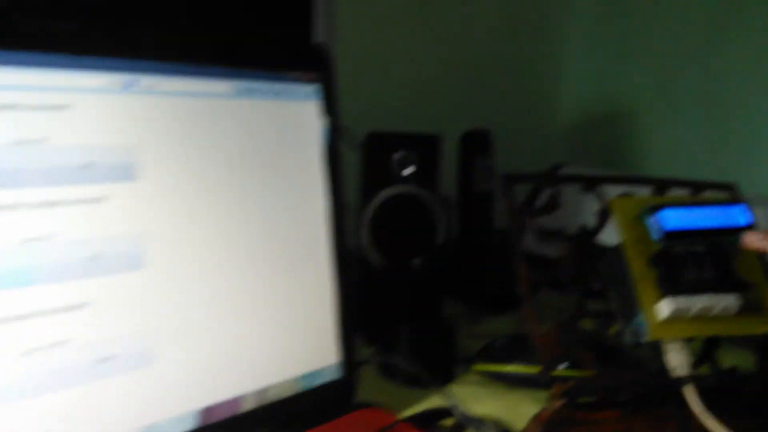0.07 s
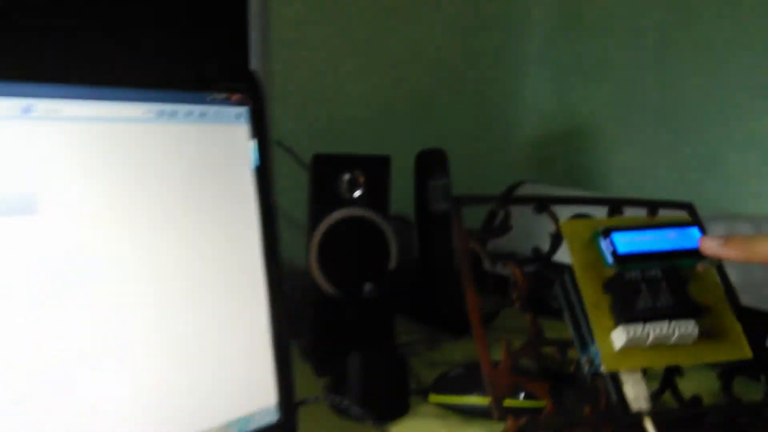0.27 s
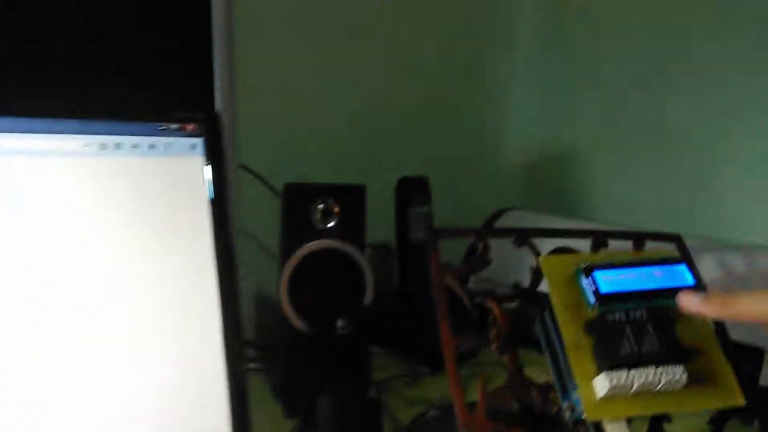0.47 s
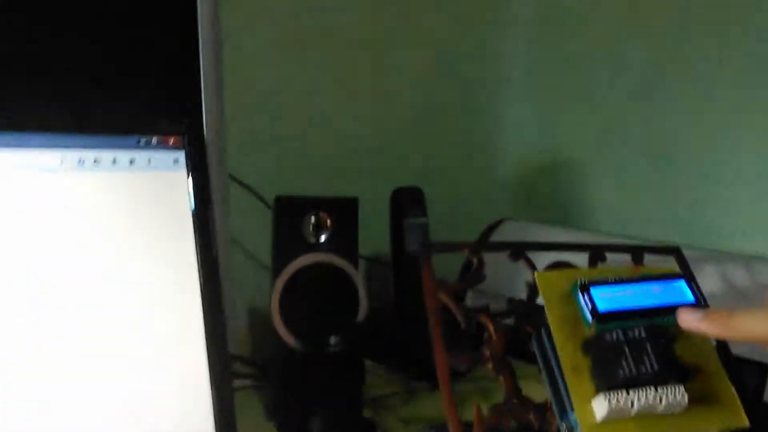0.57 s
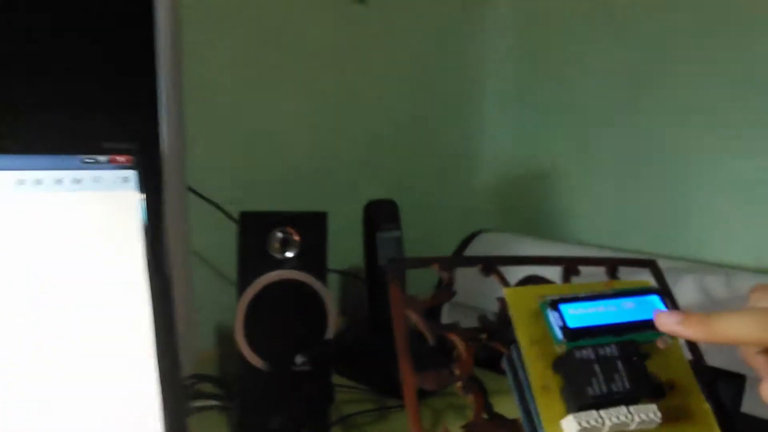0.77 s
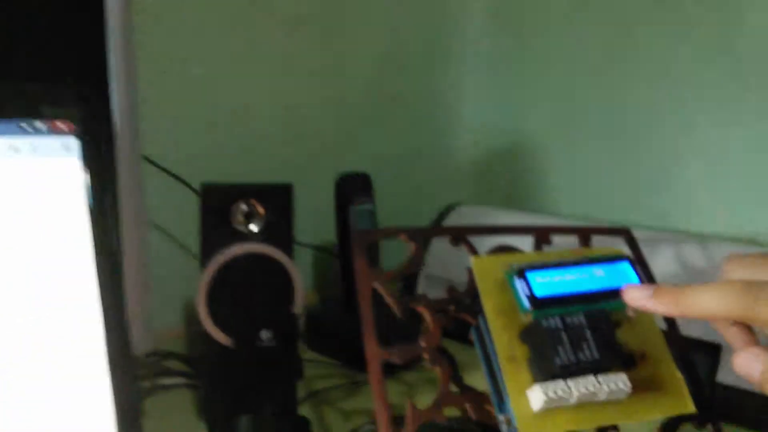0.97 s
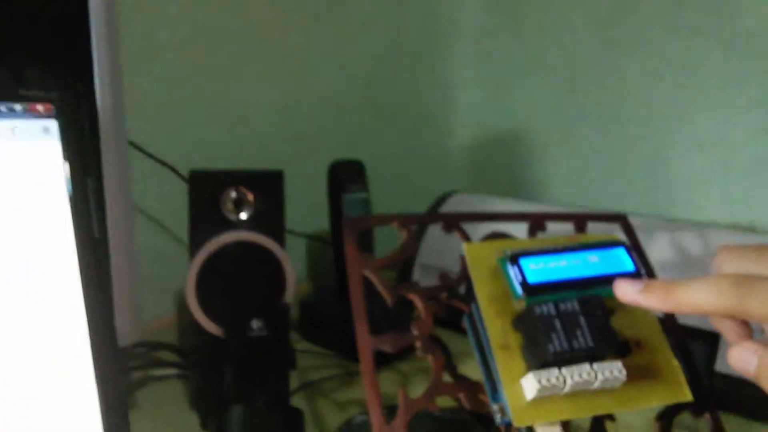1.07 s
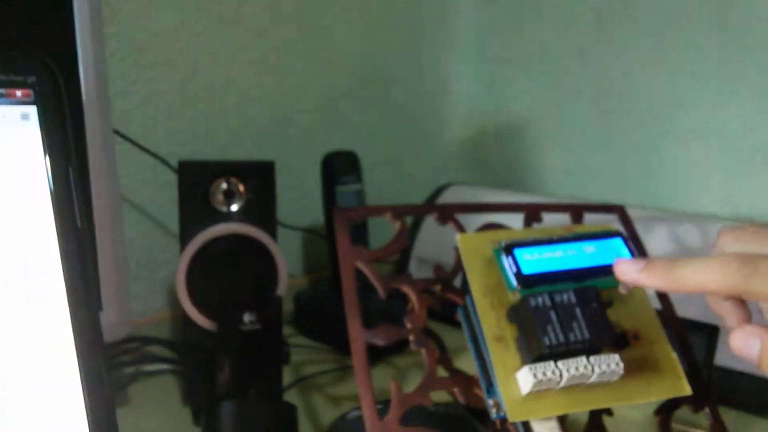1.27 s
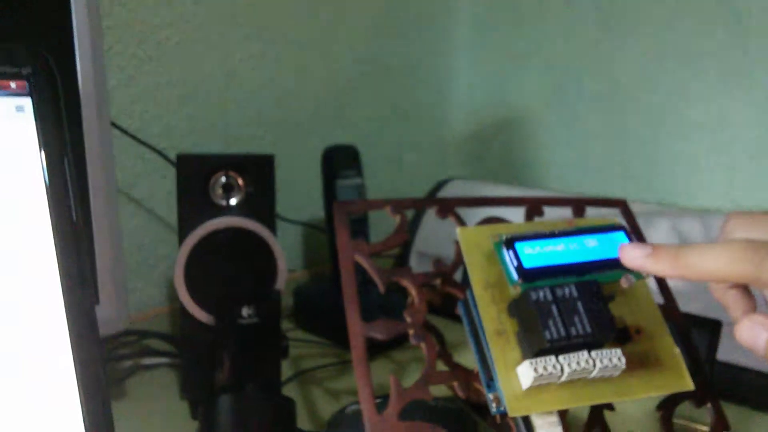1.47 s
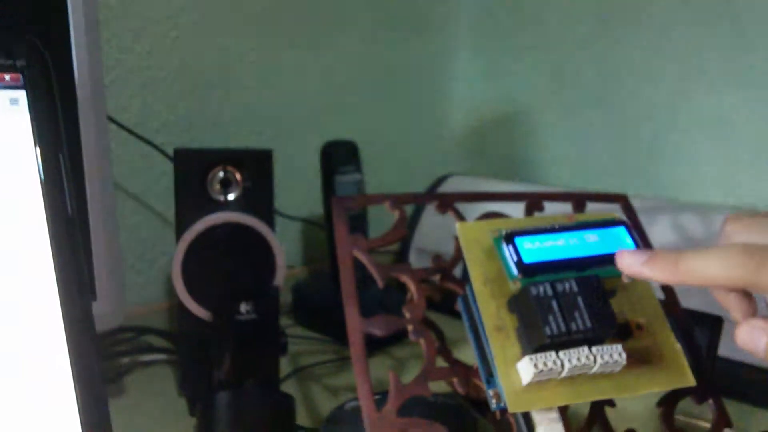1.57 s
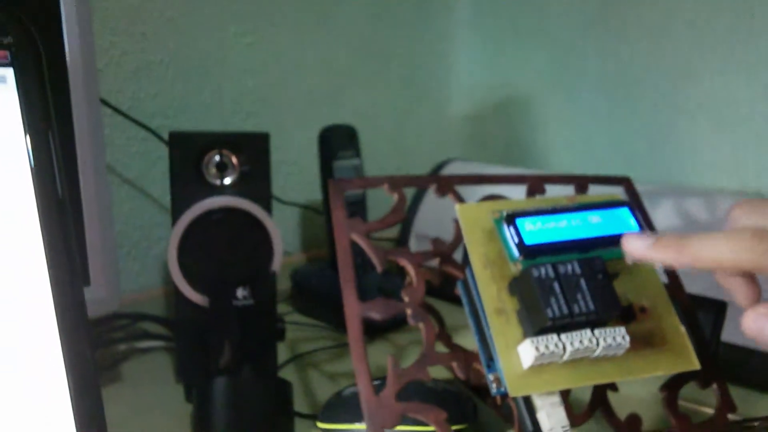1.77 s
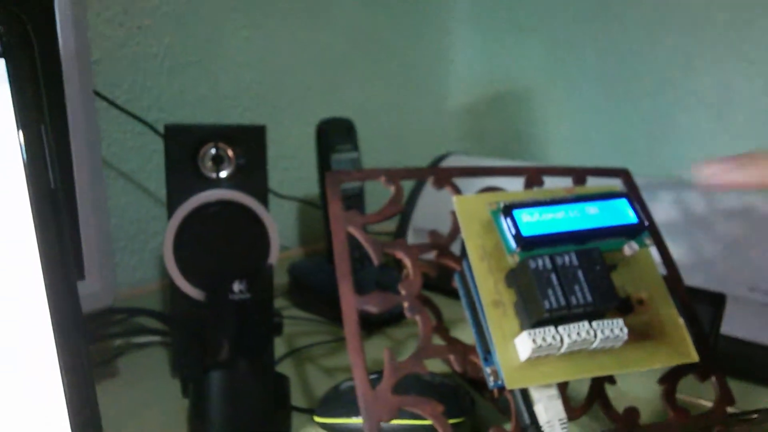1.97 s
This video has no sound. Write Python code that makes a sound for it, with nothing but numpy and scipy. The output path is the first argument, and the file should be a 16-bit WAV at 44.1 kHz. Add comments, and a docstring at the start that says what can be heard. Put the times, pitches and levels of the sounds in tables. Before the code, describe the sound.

Crisp relay clicks, seven in steady alternation, snap from a circuit board in a small room

```python
"""In a quiet room, small relays on a circuit board pull in and drop out in turn. Each armature strikes and
rebounds within a few milliseconds: noise bursts shaped like the plastic case. Every stroke also makes a bright
tick and rings the frame and springs, built from fading sine waves. The desk and room answer with echoes and
fading noise. Beneath lie a faint filtered-noise hiss, a thin wavering sine whine and soft low handling bumps."""
import sys
import numpy as np
from scipy import signal
from scipy.io import wavfile
from scipy.ndimage import uniform_filter1d

SR = 44100
rng = np.random.default_rng(int(sys.argv[2]) if len(sys.argv) > 2 else 0)


def master_out(mix):
    """Clip the mix to full scale and print it as 16-bit PCM to the path in sys.argv[1]."""
    frames = np.transpose(np.atleast_2d(mix))
    ceiling = np.clip(frames, -1, 1)
    pcm = np.round(ceiling * 32767).astype(np.int16)
    wavfile.write(sys.argv[1], SR, pcm)


N = 89567  # length of the scene in samples

# Names ending in T60 or t60_s give the seconds a sound takes to fade by 60 dB.
# Armatures pulling in: start_s, level_db (added to all parts), rebound_delay_s, rebound_db (against the strike),
# frame_db (added to frame modes), tilt_db (treble tilt, per octave high up), ping_hz, ping_db, tick_db
PULL_INS = [(.0411, -0.68, 0.0029, -27, -1, -2, 3150, -10, -5),
            (.6505, 0, .0026, 3.5, 2, -0.3, 1195, -23.5, -3.5),
            (1.2486, -0.07, .0017, -11, 3.5, 0.5, 4310, -28, -5.5),
            (1.7689, 0.2, .0010, -2.5, 1, -0.5, 7400, -17.5, -3)]
# Armatures dropping out: start_s, level_db, rebound_delay_s, rebound_db, frame_db, tilt_db,
# ping_hz, ping_db, tick_db
DROP_OUTS = [(.4102, -3.5, 0.0021, 5.5, -19, 0.013, 2926, -7.5, -2),
             (1.0011, -2.1, .0024, 13, 2, 0, 5020, -9, -2),
             (1.5590, -4.5, .0022, 4.5, 6, 0.034, 3110, -8.5, 0)]
# Ringing modes of board, frame and springs: pitch_hz, t60_s, pull_in_db, drop_out_db
RING_MODES = [(579.6, 0.43, -42.5, -38.5), (856.5, 0.086, -31.5, -51), (1185, 0.03, -28.5, -37.5),
              (1664, .045, -23.5, -19), (1894.3, 0.035, -15.5, -15), (2075, 0.015, -.5, -18),
              (2177, 0.03, -8.5, -17), (2377, 0.064, -17.5, -11), (2470, 0.025, -23.5, -18),
              (2938, 0.038, -20.5, -6), (3150, 0.029, -16.5, -27), (4295, 0.0072, -17, -22),
              (5076, 0.022, -17.5, -14.5), (8320, 0.016, -4, -14.5), (8565, 0.011, -11.5, -15)]
# Relative response of the plastic case: pitch_hz, pull_in_db, drop_out_db
CASE_RESPONSE = [(100, -42, -51), (486, -30.5, -29.5), (833.3, -34.5, -34), (1460, -14, -12),
                 (1750, -6, 0.5), (2600, -1, 1), (3420, -3.5, -4), (4500, -4.5, 1.5), (6070, 0, -1),
                 (6920, 8.5, 9.5), (8030, 6, -4), (8900, 8, 3), (9700, 2, 4), (11600, 2.5, 1),
                 (13500, 7, 6), (13600, -8.5, .5), (15250, 7, -2.5), (16200, -16.5, -6)]
# Desk echoes of the strike: delay_s, level_db
DESK_ECHOES = [(.0051, -11), (0.0086, -9)]
# Room response at each pitch: pitch_hz, t60_s, level_db
ROOM_RESPONSE = [(206, 0.79, 7), (520, 0.2, 4.5), (1106, 0.44, 2.5), (2020, 0.24, -7), (3020, .19, -5),
                 (4940, 0.19, 0), (8600, .18, -7.5), (12600, 0.21, -6), (16000, 0.12, -6.5)]
# Relative spectrum of the hiss: pitch_hz, level_db (per Hz)
HISS_SPECTRUM = [(20, -31), (50, -18), (95, -17.5), (170, -31), (270, -25), (420, -23.5), (620, -23),
                 (720, -21.5), (1010, -13), (1350, -11.5), (1550, -16.5), (1720, -14), (2100, -17.5),
                 (3050, -18.5), (3700, -22.5), (8000, -27.5), (15500, -21.5), (16200, -34)]
# Level of the whine over time: time_s, level_db
WHINE_LEVEL = [(0, -77), (0.698, -79), (1.0, -74), (1.502, -71.5), (2.001, -71)]
# Handling bumps: start_s, level_db (before rise and fade), pitch_hz
BUMPS = [(0.053, -54, 93.4), (0.104, -58.5, 96), (.271, -56, 89), (.293, -55.5, 96), (.321, -53, 96.5),
         (.599, -58, 89.3), (1.418, -67.5, 89)]

# Plastic case: RIPPLE_DB is the spread of its random unevenness, new for every stroke
CASE_DB, CASE_T60, CASE_RISE_S = 1.5, 0.034, 0.00005
RIPPLE_DB, TILT_FROM_HZ = 2.5, 3100
# Frame: it swells, and rings on while the armature settles; the held part fades at its own rate
FRAME_FROM_HZ, FRAME_BELOW_HZ = 1900, 2300
FRAME_SWELL_S, FRAME_HOLD_S, HELD_T60 = 0.0026, 0.0083, 0.35
# Springs and all other modes, and the stroke's own ping
SPRING_SWELL_S, SPRING_HOLD_S, PING_T60 = 0.00056, 0.0025, 0.03
# How much of each ring comes back from the room, and the extra fade of that tail
FRAME_WET_DB, SPRING_WET_DB, RING_ROOM_T60 = 1, 4.5, 1
# Bright tick of first contact
TICK_T60, TICK_LOW_HZ, TICK_HIGH_HZ = 0.011, 12000, 13000
# Room: scattered early echoes, a long late tail, and the rise of both
SCATTER_DB, SCATTER_T60, ROOM_RISE_S = -17.5, 0.063, 0.0015
LATE_DB, LATE_T60 = -18, 0.55
BUMP_RISE_S, BUMP_T60 = 0.0016, 0.091
# Hiss level, and the spread of its drifting patches
HISS_DB, PATCHY_DB = -66.5, 2.6
# Middle pitch of the whine, and the spread of its random waver
WHINE_HZ, WHINE_WAVER_HZ = 1020, 6.25
EDGE_HZ = 15950  # upper edge of the whole sound


def relay(strokes, column):
    """Each stroke ticks, cracks the case and rings frame and springs; column 1 is pull-in, 2 is drop-out."""
    out = np.zeros(N)
    for s, db, rebound_s, rebound_db, frame_db, tilt_db, ping_hz, ping_db, tick_db in strokes:
        add(out, s, amp(db + tick_db) * tick())
        add(out, s, amp(db + CASE_DB) * crack(rebound_s, rebound_db, tilt_db, column))
        ping = ring(ping_hz, PING_T60, SPRING_SWELL_S, SPRING_HOLD_S, SPRING_WET_DB)
        add(out, s, amp(db + ping_db) * ping)
        for hz, t60, *mode_db in RING_MODES:
            if FRAME_FROM_HZ < hz < FRAME_BELOW_HZ:
                frame = ring(hz, t60, FRAME_SWELL_S, FRAME_HOLD_S, FRAME_WET_DB)
                sound = amp(frame_db) * frame
            else:
                sound = ring(hz, t60, SPRING_SWELL_S, SPRING_HOLD_S, SPRING_WET_DB)
            add(out, s, amp(db + mode_db[column - 1]) * sound)
    return out


def crack(rebound_s, rebound_db, tilt_db, column):
    """Strike and rebound shake the case's many close modes; the desk echoes and the room answers."""
    t = np.arange(SR // 10) / SR
    # the room answers the combined energy of strike and rebound
    out = room(LATE_DB) * np.hypot(1, amp(rebound_db))
    knocks = [(0, 0), (rebound_s, rebound_db)] + list(DESK_ECHOES)
    for delay_s, db in knocks:
        rise = 1 - np.exp(-t / CASE_RISE_S)
        add(out, delay_s, amp(db) * dying_noise(t, CASE_T60) * rise)
    ripple_db = RIPPLE_DB * rng.standard_normal(size=100)
    ripple_hz = np.linspace(0, SR / 2, len(ripple_db))

    def case_db(hz):
        """Loudness the case gives each pitch, with its ripple and treble tilt."""
        tilt = tilt_db * np.log2(1 + hz / TILT_FROM_HZ)
        return read(CASE_RESPONSE, hz, column) + np.interp(hz, ripple_hz, ripple_db) + tilt

    return unit(colour(out, case_db))


def ring(hz, t60, swell_s, hold_s, wet_db):
    """One mode, a sine wave, swells, holds, dies and lingers in the room."""
    t = np.arange(SR // 5) / SR
    held_s = np.minimum(t, hold_s)
    free_s = np.maximum(t - hold_s, 0)
    fall_db = -60 * (held_s / HELD_T60 + free_s / t60)
    wave = np.sin(2 * np.pi * (hz * t + rng.random()))  # starts at a random point of its cycle
    direct = unit(amp(fall_db) * (1 - np.exp(-t / swell_s)) * wave)
    tail = unit(signal.fftconvolve(direct, room(late_db=-39)))
    tail_s = np.arange(len(tail)) / SR
    tail_db = wet_db + read(ROOM_RESPONSE, hz, column=2) - 60 * tail_s / RING_ROOM_T60
    out = amp(tail_db) * tail
    add(out, 0, direct)
    return unit(out)


def tick():
    """Metal on metal gives a very short, bright burst: fading noise kept to a high band."""
    burst = dying_noise(np.arange(SR // 50) / SR, TICK_T60)
    band = signal.butter(1, [TICK_LOW_HZ, TICK_HIGH_HZ], "bandpass", fs=SR, output="sos")
    return unit(signal.sosfilt(band, burst))


def room(late_db):
    """The room's many echoes: noise fading at its own rate at each pitch, near scatter and a late tail."""
    t = np.arange(SR * 2 // 3) / SR
    hz, frame_s, z = signal.stft(rng.standard_normal(len(t)), SR, nperseg=256)
    t60 = read(ROOM_RESPONSE, hz)[:, None]
    level_db = read(ROOM_RESPONSE, hz, column=2)[:, None]
    # balances the energy of long and short fades
    balance = np.sqrt(2 * np.log(1000) / (t60 * SR))
    z = z * amp(level_db - 60 * frame_s / t60) * balance
    tail = signal.istft(z, SR, nperseg=256)[1][:len(t)]
    scatter = amp(SCATTER_DB) * dying_noise(t, SCATTER_T60)
    late = amp(late_db) * dying_noise(t, LATE_T60)
    return (tail + scatter + late) * (1 - np.exp(-t / ROOM_RISE_S))


def handling():
    """Handling gives soft low bumps, each a quickly fading sine wave."""
    out = np.zeros(N)
    t = np.arange(SR // 5) / SR
    rise = 1 - np.exp(-t / BUMP_RISE_S)
    for s, db, hz in BUMPS:
        add(out, s, amp(db - 60 * t / BUMP_T60) * rise * np.sin(2 * np.pi * hz * t))
    return out


def hiss():
    """Steady noise follows a spectrum, with faint random patches drifting over pitch and time."""
    hz, _, z = signal.stft(rng.standard_normal(N), SR, nperseg=2048)
    patches = uniform_filter1d(rng.standard_normal(z.shape), size=14, axis=0)  # smooth over pitch
    patches = uniform_filter1d(patches, size=6, axis=1)  # smooth over time
    z = z * amp(read(HISS_SPECTRUM, hz)[:, None] + PATCHY_DB * patches / patches.std())
    noise = signal.istft(z, SR, nperseg=2048)[1][:N]
    return amp(HISS_DB) * noise / noise.std()


def whine():
    """A thin sine tone wavers as smoothed noise pushes its pitch up and down."""
    waver = uniform_filter1d(rng.standard_normal(N), size=1500)
    pitch_hz = WHINE_HZ + WHINE_WAVER_HZ * waver / waver.std()
    tone = np.sin(2 * np.pi * np.cumsum(pitch_hz) / SR)
    level_db = np.interp(np.arange(N) / SR, *np.transpose(WHINE_LEVEL))
    return amp(level_db) * tone


def amp(db):
    """Turns decibels into a plain multiplier."""
    return 10 ** (np.asarray(db) / 20)


def unit(x):
    """Scales a sound to an energy of one."""
    return x / np.sqrt(np.sum(x ** 2) + 1e-20)


def read(table, hz, column=1):
    """Reads between table rows on a log-frequency axis."""
    table = np.array(table)
    return np.interp(np.log(hz + 1), np.log(table[:, 0]), table[:, column])


def add(mix, s, sound):
    """Adds a sound to the mix at s seconds, cutting what runs past the end."""
    part = mix[max(round(s * SR), 0):][:len(sound)]
    part += sound[:len(part)]


def colour(x, curve, size=4096):
    """Filters without any sound ahead of the strike, following curve(Hz) in dB."""
    hz = abs(np.fft.fftfreq(size, 1 / SR))
    log_gain = np.log(amp(curve(hz)))
    # minimum phase: the filter responds as early as it can
    taps = np.fft.ifft(np.exp(np.conj(signal.hilbert(log_gain)))).real
    return signal.fftconvolve(x, taps[:size // 2])[:len(x)]


def dying_noise(t, t60):
    """Many close modes or echoes fade together, like noise dying away."""
    return unit(rng.standard_normal(len(t)) * amp(-60 * t / t60))


def scene():
    """Adds the relays, the handling bumps and the background as one channel."""
    relays = relay(PULL_INS, column=1) + relay(DROP_OUTS, column=2)
    return (relays + handling() + hiss() + whine())[None]


def record(dry):
    """A low-pass filter removes the treble above the upper edge."""
    low_pass = signal.firwin(301, EDGE_HZ, window=("kaiser", 9), fs=SR)
    return signal.oaconvolve(dry, low_pass[None], "same")


dry = scene()
out = record(dry)
master_out(out)
```